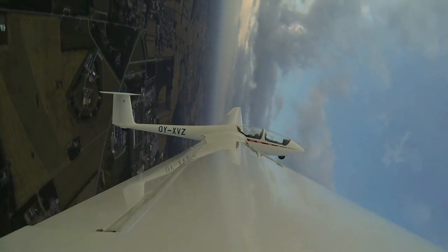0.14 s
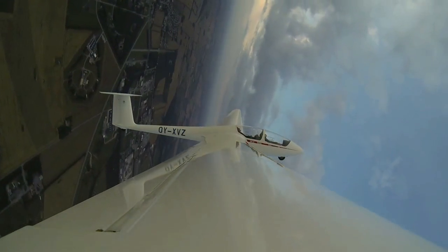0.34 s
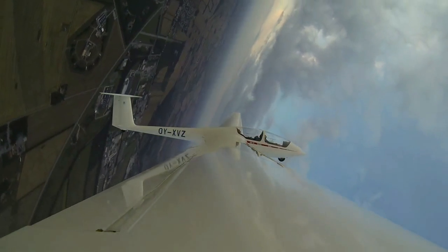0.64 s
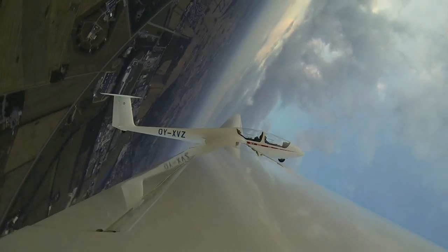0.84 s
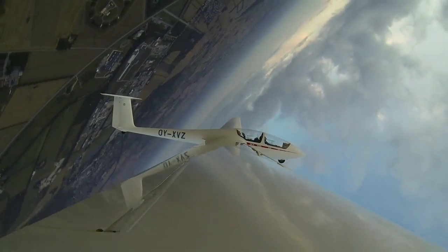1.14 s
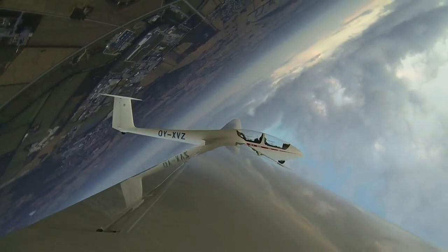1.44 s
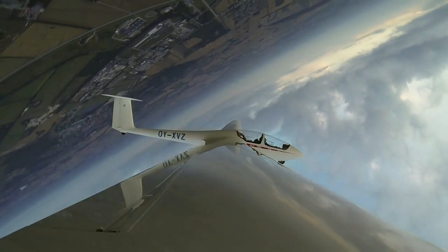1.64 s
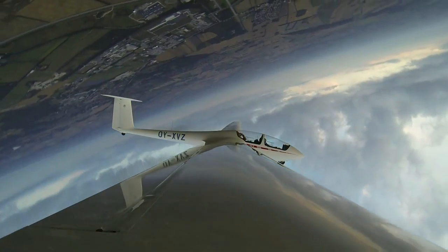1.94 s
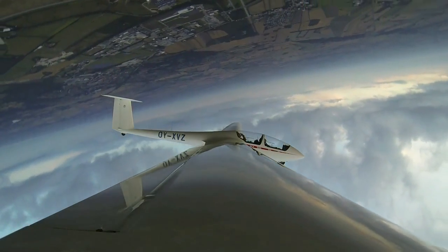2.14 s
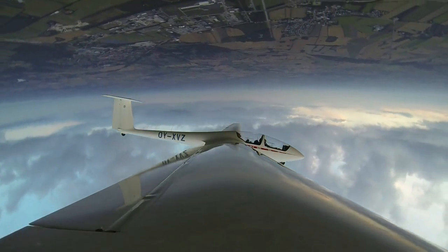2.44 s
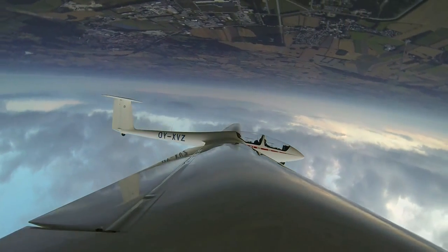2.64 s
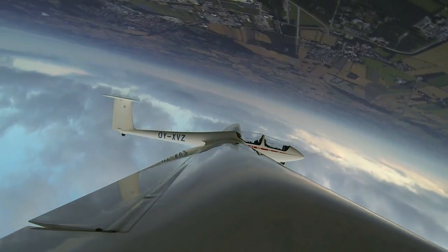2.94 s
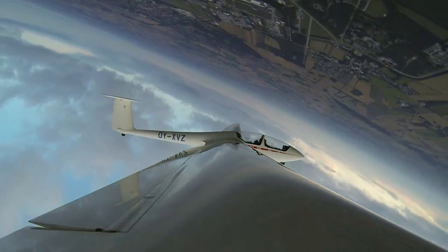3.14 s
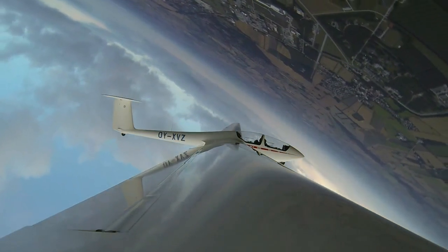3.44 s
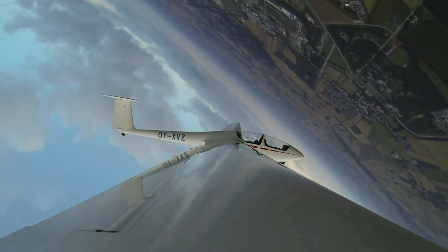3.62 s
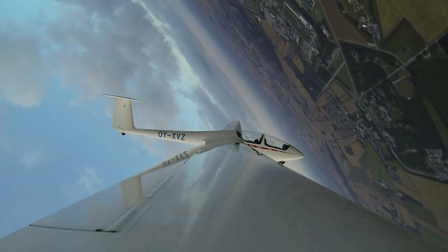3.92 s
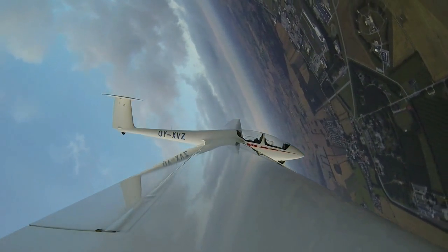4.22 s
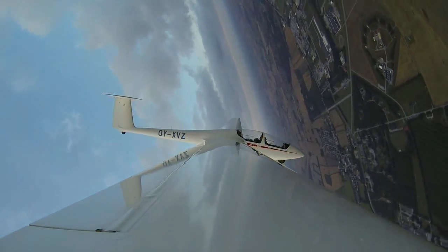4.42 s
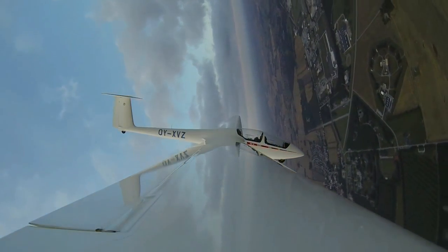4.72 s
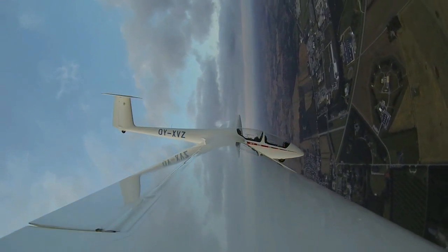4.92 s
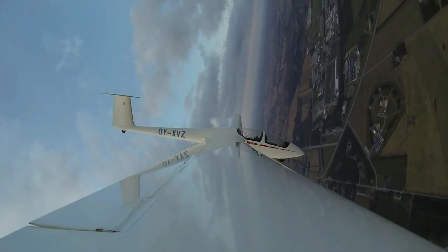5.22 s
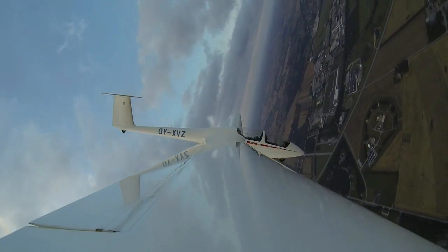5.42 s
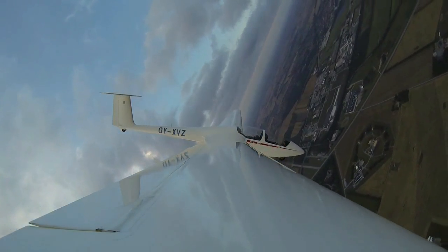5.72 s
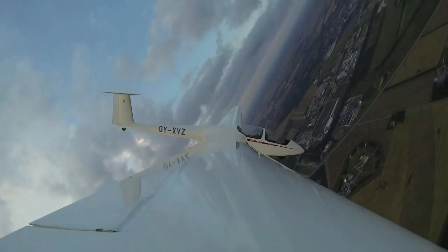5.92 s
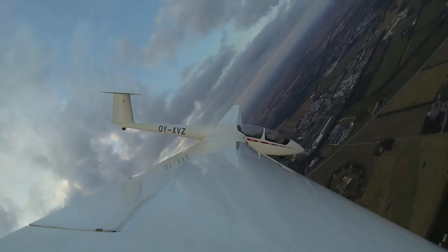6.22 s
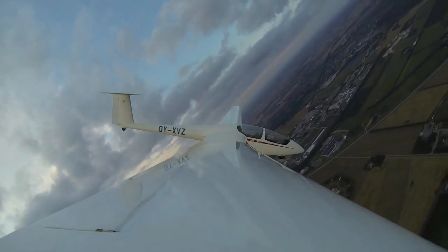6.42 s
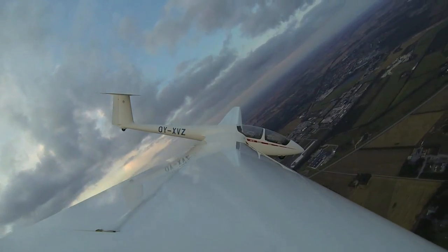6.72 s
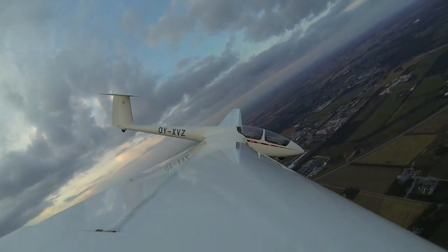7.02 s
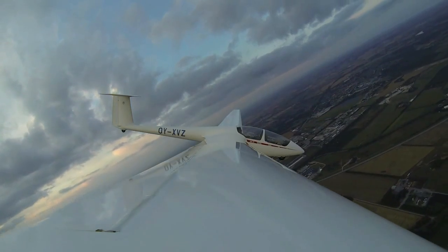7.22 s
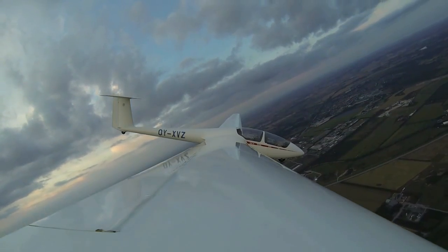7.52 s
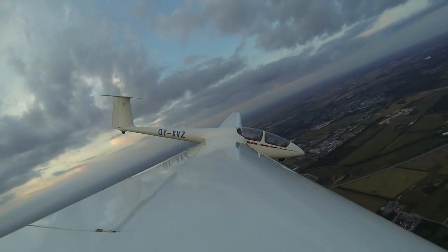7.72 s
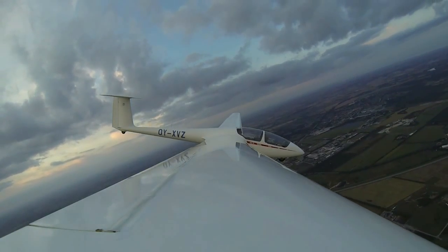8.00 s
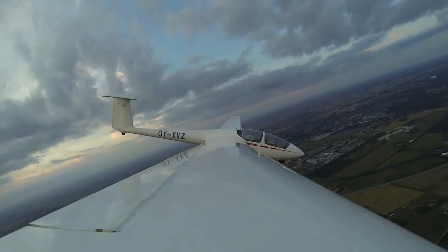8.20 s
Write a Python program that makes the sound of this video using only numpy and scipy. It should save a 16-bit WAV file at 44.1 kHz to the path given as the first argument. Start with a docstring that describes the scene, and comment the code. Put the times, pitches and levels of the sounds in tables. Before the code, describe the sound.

Close inside a sealed camera housing on a glider's wing, air rushes without pause. A hollow mid-pitched howl sits over low rumble and broad hiss, while the mount shudders in deep irregular thumps. The wind eases over the first few seconds, picks up mid-roll with faint breathy whistles, then grows into a fuller, hissier rush as the shaking subsides.

```python
"""Camera on a glider's wing

The microphone rides in a closed housing while turbulence shakes its mount: sines at two bending modes, swelling at random.
Filtered noise makes the air: a low rumble, a buffeted shell, the housing's howl and a hiss through its high modes.
Buffet, howl and hiss follow one airflow curve; a few faint breathy whistles from gaps rise in the middle of the roll.
The input stage rounds the highest peaks and cuts the band at the top."""
import sys
import numpy as np
from scipy import signal
from scipy.fft import rfft, irfft, next_fast_len
from scipy.io import wavfile
from scipy.ndimage import uniform_filter1d, map_coordinates

SR = 44100
rng = np.random.default_rng(int(sys.argv[2]) if len(sys.argv) > 2 else 0)


def persist_wave(psi):
    """Save psi, clipped to +-1, as 16-bit WAV."""
    counts = np.round(np.clip(psi, -1, 1) * 32767).astype(np.int16)
    wavfile.write(sys.argv[1], SR, np.atleast_2d(counts).T)


N = 368676  # samples, 8.36 s


def amp(db):
    """Gain of a level in dB."""
    return 10 ** (np.asarray(db) / 20)


def unit(x):
    """x at rms 1."""
    return x / np.sqrt(np.mean(x ** 2) + 1e-20)


def curves(rows):
    """One value per sample for each column after the time, in straight lines between rows."""
    s, *columns = np.transpose(rows)
    t = np.arange(N) / SR
    return [np.interp(t, s, column) for column in columns]


def wobble(rate):
    """A smooth random curve around zero, rate knots a second (90 at most)."""
    knots = rng.standard_normal(800)
    return map_coordinates(knots, [np.arange(N) * min(rate, 90) / SR])


def bump(peak_s, half_s):
    """A bell-shaped rise to 1 at peak_s; half_s away it is down to 1/e."""
    return np.exp(-((np.arange(N) / SR - peak_s) / half_s) ** 2)


def filtered(x, response):
    """x through a gain that depends on frequency, padded so that the tail does not wrap round."""
    m = next_fast_len(N + SR // 2)
    spectrum = rfft(x, m) * response(np.fft.rfftfreq(m, 1 / SR))
    return irfft(spectrum, m)[..., :N]


def slope(points, hz):
    """Gain of (f/Hz, level/dB) points joined on a log frequency axis."""
    f, db = np.transpose(points)
    return amp(np.interp(np.log(hz + 1), np.log(f), db))


def modes(table, hz, steep):
    """Summed power of resonances (f/Hz, width/Hz, level/dB); steep sharpens their skirts."""
    return sum(amp(db) ** 2 / (1 + (2 * (hz - centre) / width) ** 2) ** steep
               for centre, width, db in table)


def eddies(response, patchy_db):
    """Turbulence: noise with time-frequency patches of random strength, through a response, at rms 1."""
    bins = signal.stft(rng.standard_normal(N + 512), nperseg=512)[2]
    across_pitch = uniform_filter1d(rng.standard_normal(bins.shape), size=8, axis=0)
    patches = uniform_filter1d(across_pitch, size=12, axis=1)
    noise = signal.istft(bins * amp(patchy_db * unit(patches)), nperseg=512)[1][:N]
    return unit(filtered(noise, response))


def whistles():
    """Air across narrow gaps sings in breathy bands, loudest in the middle of the roll."""
    # the gaps: (f/Hz, width/Hz, resting level/dB, rise at the peak/dB)
    gaps = [(3700, 130, -57, 10), (4570, 90, -60, 9), (6580, 220, -57.5, 4)]
    rise = bump(peak_s=3.8, half_s=0.98)
    total = 0
    for centre, width, db, rise_db in gaps:
        band = eddies(lambda hz: np.sqrt(modes([(centre, width, 0)], hz, steep=1.2)), patchy_db=.7)
        total = total + amp(db + rise_db * rise) * band
    return total


def shell(hz):
    """Gain of the shell, whose low modes ring on top of the air that drives them."""
    # low modes: (f/Hz, width/Hz, level over the driving air/dB)
    low_modes = [(179, 19.4, 4.5), (356, 26, -2.5), (621, 83, 2.5)]
    return np.sqrt(1 + modes(low_modes, hz, steep=2.3))


def rumble():
    """Large slow eddies rolling over the wing, heard through the shell."""
    # how the rumble comes and goes: (t/s, level/dB)
    rolling = [(0, -24), (3, -27), (4.1, -23), (5, -23), (6.3, -24.5), (8.36, -27.5)]
    # its relative spectrum before the shell: (f/Hz, level/dB)
    low_spectrum = [(8, -10), (20, 5), (35, 9), (51, 8), (75, 8.5), (100, 3), (130, 6), (190, 2),
                    (260, -4.5), (400, -33), (900, -120)]
    level_db, = curves(rolling)
    return amp(level_db) * eddies(lambda hz: slope(low_spectrum, hz) * shell(hz), patchy_db=-0.2)


def buffet(level_db, gust):
    """Turbulent air knocks on the shell and sets its low modes ringing."""
    # relative spectrum before the shell: (f/Hz, level/dB)
    knock_spectrum = [(100, -40), (190, -2.5), (300, -4), (520, -10.5), (760, -12.5), (1000, -11),
                      (2000, -41), (3000, -52), (6000, -120)]
    noise = eddies(lambda hz: slope(knock_spectrum, hz) * shell(hz), patchy_db=0.62)
    return amp(level_db + 0.6 * gust) * noise


def hiss(level_db, fizz_db, gust):
    """Fine eddies hiss through the housing's high modes; the part above the knee has its own level."""
    knee_hz = 8500
    # relative spectrum before the modes: (f/Hz, level/dB)
    hiss_spectrum = [(900, -7.5), (1900, -0.5), (2700, -5), (3600, -8), (4500, -16.5), (6200, -16.5),
                     (8900, -24), (12000, -27.5), (13900, -29), (15300, -35)]
    # high modes of the housing: (f/Hz, width/Hz, level over the hiss/dB)
    high_modes = [(2396, 410, 5), (2922, 310, 10.5), (3270, 350, 2.5), (4140, 510, 4.5), (5054, 850, 10),
                  (5770, 420, 3.5), (7940, 740, 8), (10420, 1500, 7.5), (14800, 900, 6)]

    def housing(hz):
        return slope(hiss_spectrum, hz) * np.sqrt(1 + modes(high_modes, hz, steep=1.85))

    def fine(hz):
        """Share of the power that belongs to the smallest eddies."""
        return 1 / (1 + (knee_hz / (hz + 1)) ** 5)

    below = eddies(lambda hz: housing(hz) * np.sqrt(1 - fine(hz)), patchy_db=0.33)
    fizz = eddies(lambda hz: housing(hz) * np.sqrt(fine(hz)), patchy_db=.3)
    below = amp(level_db + 0.48 * wobble(30)) * below
    fizz = amp(fizz_db + 0.28 * wobble(32)) * fizz
    return amp(0.37 * gust) * (below + fizz)


def howl(lower_db, upper_db, gust):
    """The housing howls: noise through two clusters of resonances, each flickering on its own."""
    # lower cluster: (f/Hz, width/Hz, relative level/dB)
    lower_modes = [(1184, 105, -0.5), (1288, 216, -2.5)]
    # upper cluster: (f/Hz, width/Hz, relative level/dB)
    upper_modes = [(1499, 320, 1.5), (1720, 356, -9)]
    lower = eddies(lambda hz: np.sqrt(modes(lower_modes, hz, steep=2.33)), patchy_db=0.3)
    upper = eddies(lambda hz: np.sqrt(modes(upper_modes, hz, steep=1.92)), patchy_db=0.0)
    lower = amp(lower_db + 0.94 * gust + 0.6 * wobble(5)) * lower
    upper = amp(upper_db + 0.48 * gust + 0.88 * wobble(6)) * upper
    return lower + upper


def airflow():
    """Buffet, howl and hiss share one airflow and its small gusts; the rumble rolls on its own."""
    # airflow before each layer takes its share: (t/s, strength/dB, extra drive of the howl/dB)
    flow = [(0, 0, -0.5), (.5, -1.5, 0), (1.1, -2.5, 2.5), (1.65, -4.5, 1.5), (1.95, -3.5, 0.5),
            (2.5, -5, 0), (3.1, -4.5, .5), (3.5, -4, 2.5), (3.9, -0.5, 3), (4.45, -0.5, 4.5),
            (4.7, -0.5, 2), (5.2, 2.5, 1.5), (5.6, 2.5, -1), (6, 3.5, -1), (6.6, 4, -2), (7.3, 5, -3),
            (8.36, 4.5, -3)]
    # short gusts added to the strength: (t/s at the peak, rise/dB)
    short_gusts = [(4.05, 1.5), (4.46, 1.5), (5.4, 1.5)]
    # buffet, howl, upper howl, hiss, fizz: (base level/dB, share of strength, share of extra drive)
    layers = dict(buffet=(-27.5, 0.91, .1), howl=(-19.5, 0.73, 0.69), upper=(-22.5, 1.27, 0.9),
              hiss=(-32, 1.06, 0.01), fizz=(-48, 0.92, 0.55))
    strength_db, extra_db = curves(flow)
    strength_db = strength_db + sum(db * bump(s, half_s=.09) for s, db in short_gusts)
    buffet_db, howl_db, upper_db, hiss_db, fizz_db = (
        base_db + strength_share * strength_db + extra_share * extra_db
        for base_db, strength_share, extra_share in layers.values())
    gust = wobble(7.4)  # each layer scales it to dB
    return (rumble() + buffet(buffet_db, gust) + hiss(hiss_db, fizz_db, gust)
            + howl(howl_db, upper_db, gust))


def swing(hz, wander, flicker_db, rate):
    """A randomly driven mode of rms 1: a sine whose pitch wanders and whose size flickers."""
    phase = 2 * np.pi * np.cumsum(hz * (1 + wander * wobble(rate))) / SR
    flicker = amp(flicker_db * wobble(rate))
    return unit(flicker * np.sin(phase + rng.uniform(0, 2 * np.pi)))


def fits(drive_db, swings, half_s, ceiling, rate):
    """Size of a mode: it fades out and returns at random around its drive, topped by the strongest swings."""
    peaks = sum(amp(db) ** 2 * bump(s, half_s) for s, db in swings)  # power
    size = ceiling * np.tanh(np.hypot(wobble(rate), wobble(rate)) / ceiling)
    return np.sqrt((amp(drive_db) * size) ** 2 + peaks)


def mount():
    """Turbulence shakes the camera mount at its two bending modes, close to the microphone."""
    # how hard the mount is driven: (t/s, first mode level/dB, second mode level/dB)
    shake = [(0, -26, -35), (.6, -22.5, -33), (1.3, -19, -35), (2.3, -22.5, -34), (3.5, -22.5, -31),
             (4.5, -22.5, -31), (5.9, -25, -40), (6.3, -25.5, -35), (7.3, -27, -36), (8.36, -28, -35)]
    # strongest swings of the first mode, over the random drive: (t/s at the peak, level/dB)
    big_swings = [(.22, -20), (.37, -18), (.78, -13.5), (1.14, -16), (1.35, -17), (1.53, -14), (1.63, -17),
                  (1.89, -21), (2.08, -8.5), (2.62, -16), (2.79, -15), (3.11, -16.5), (3.21, -24),
                  (3.33, -22), (3.79, -15), (4.84, -17), (5.21, -14.5), (5.4, -17.5), (5.59, -16),
                  (5.68, -16), (5.93, -15.5), (7.5, -19)]
    # strongest swings of the second mode, over the random drive: (t/s at the peak, level/dB)
    quick_swings = [(.12, -28), (.52, -25), (1.99, -22.5), (2.79, -21.5), (2.96, -24), (3.05, -26),
                    (3.57, -16), (3.84, -28), (4.2, -20), (4.34, -20), (4.47, -25.5), (5.15, -22),
                    (8.31, -25)]
    swing_s = 0.031  # half-length of one strong swing
    first_db, second_db = curves(shake)
    first_hz = 51.25 + 1.58 * wobble(3)  # slow drift
    first = swing(first_hz, wander=0.0798, flicker_db=1.5, rate=40)
    first = first * fits(first_db, big_swings, swing_s, ceiling=1.94, rate=12)
    second = swing(149.7, wander=0.0268, flicker_db=1.0, rate=25)
    second = second * fits(second_db, quick_swings, swing_s, ceiling=2.4, rate=14)
    return first + second


def scene():
    """All sources reach the one microphone inside the housing."""
    return (whistles() + airflow() + mount())[None]


def record(dry):
    """The input stage rounds the highest peaks; nothing is kept above the band limit."""
    ceiling, top_hz = .95, 15290
    soft = dry / (1 + np.abs(dry / ceiling) ** 5) ** (1 / 5)
    return filtered(soft, lambda hz: hz < top_hz)


dry = scene()
out = record(dry)
persist_wave(out)
```